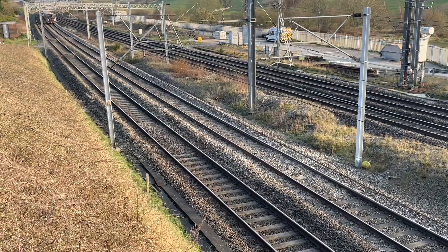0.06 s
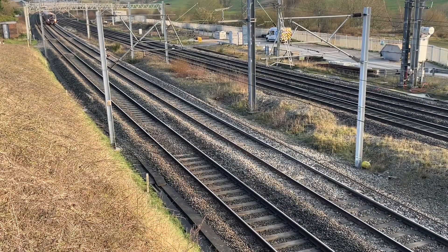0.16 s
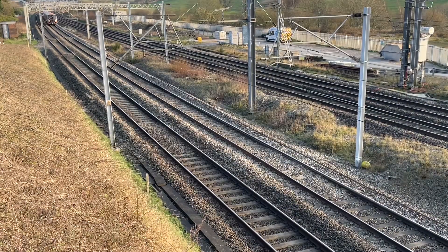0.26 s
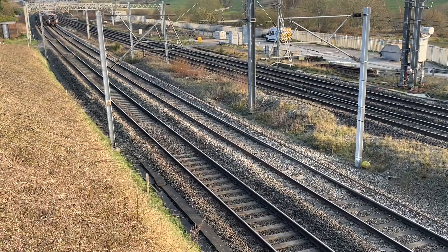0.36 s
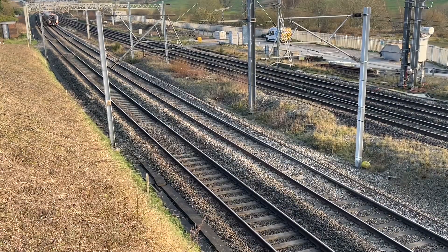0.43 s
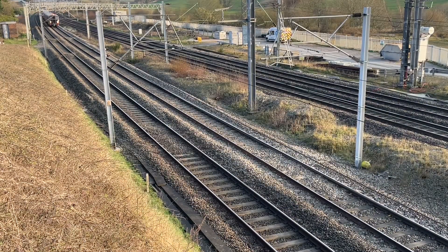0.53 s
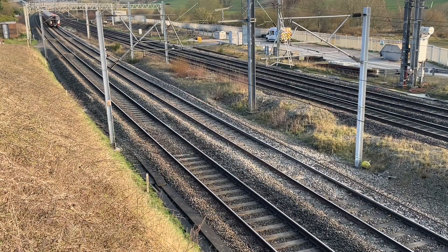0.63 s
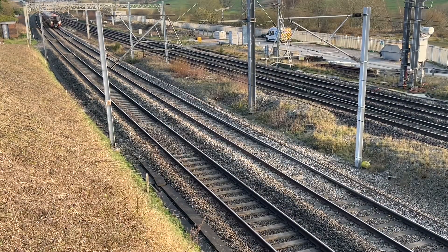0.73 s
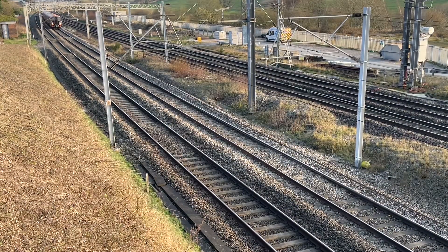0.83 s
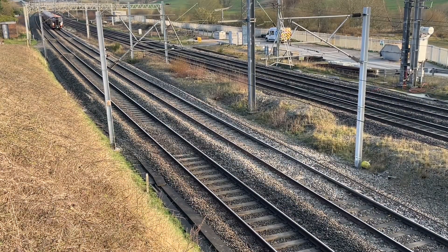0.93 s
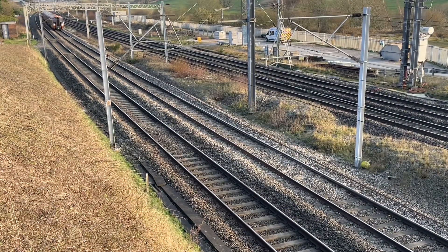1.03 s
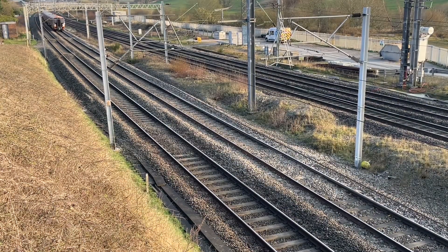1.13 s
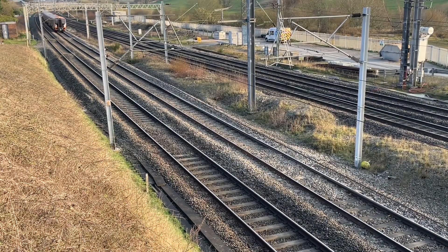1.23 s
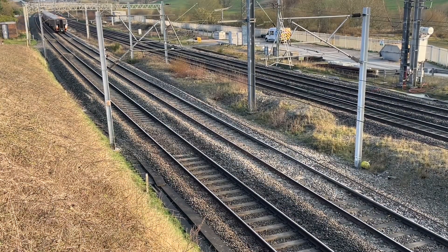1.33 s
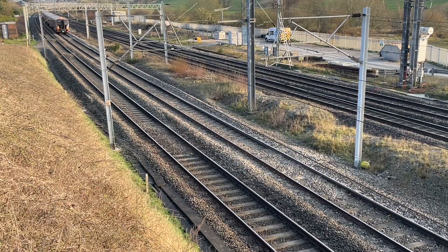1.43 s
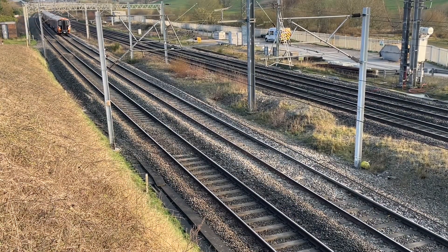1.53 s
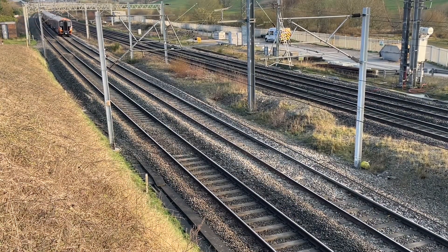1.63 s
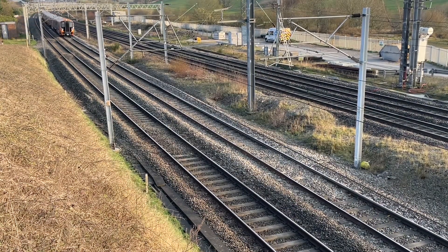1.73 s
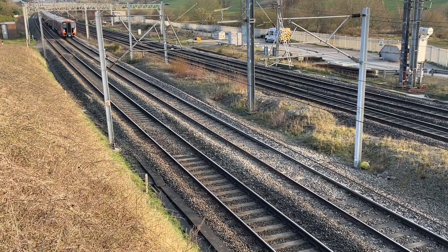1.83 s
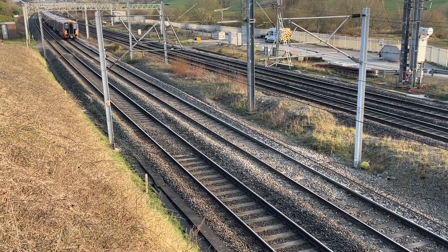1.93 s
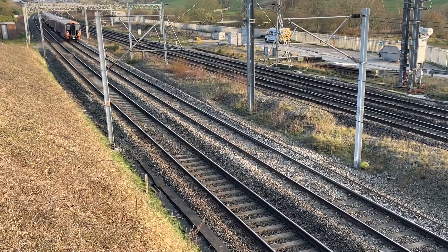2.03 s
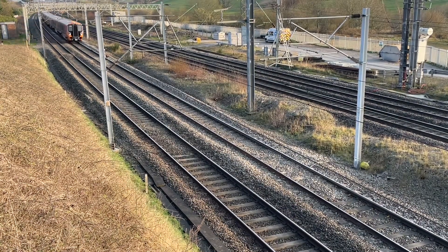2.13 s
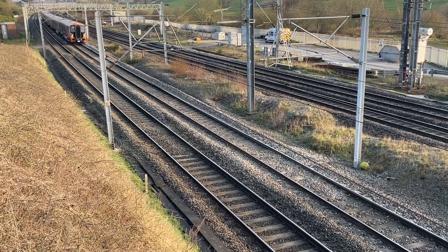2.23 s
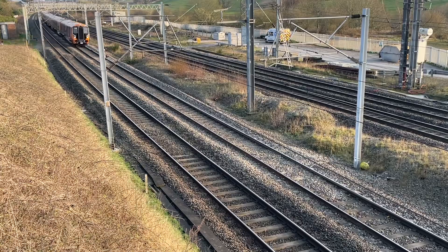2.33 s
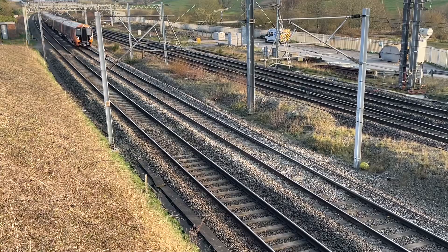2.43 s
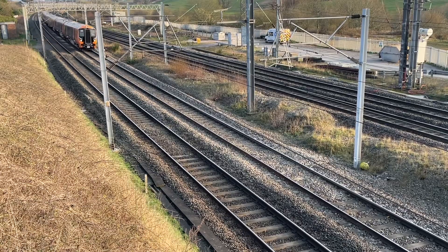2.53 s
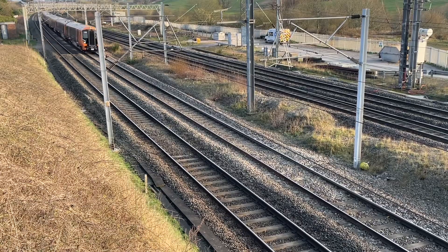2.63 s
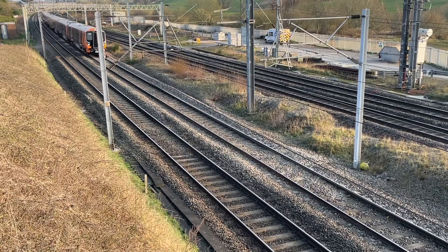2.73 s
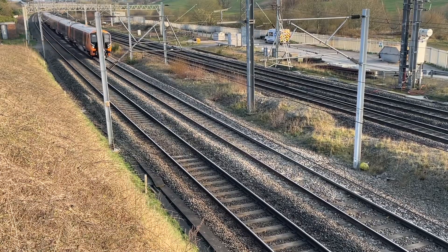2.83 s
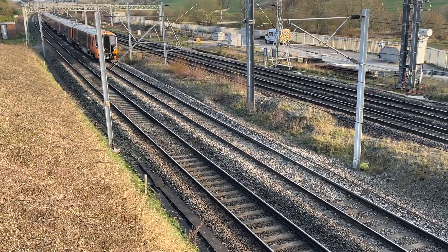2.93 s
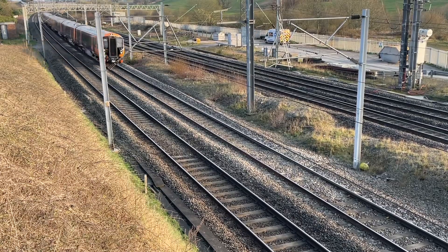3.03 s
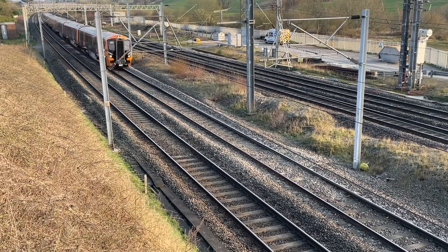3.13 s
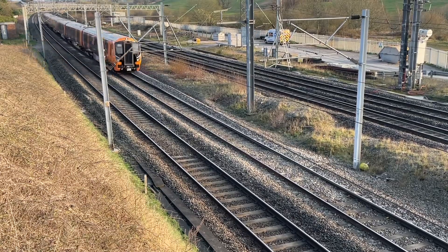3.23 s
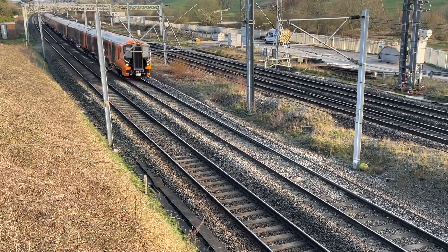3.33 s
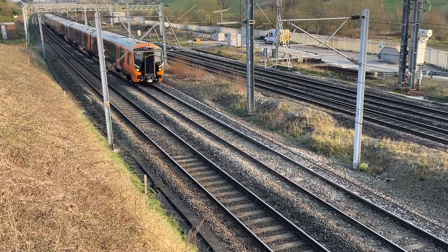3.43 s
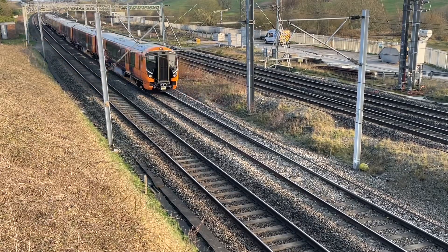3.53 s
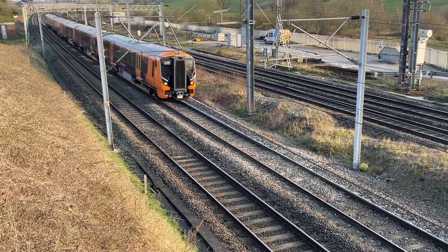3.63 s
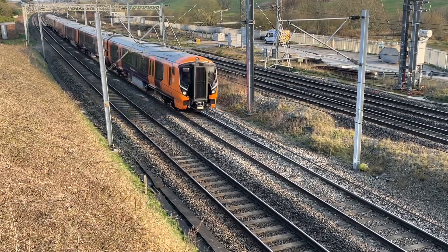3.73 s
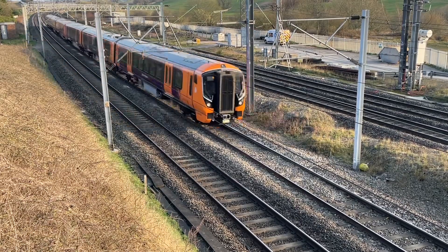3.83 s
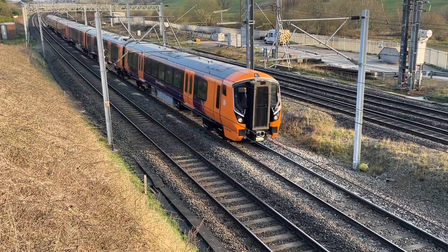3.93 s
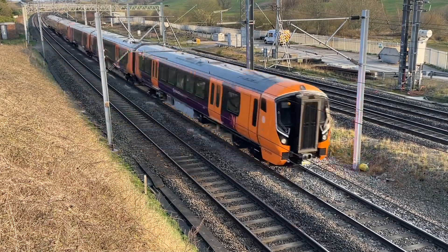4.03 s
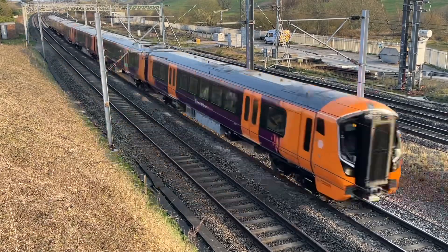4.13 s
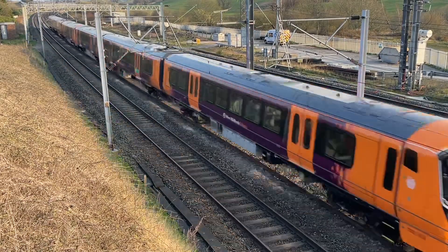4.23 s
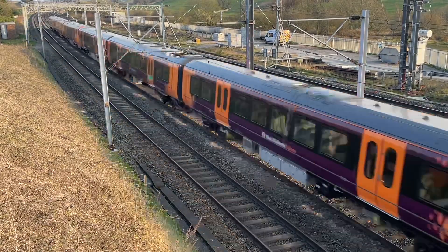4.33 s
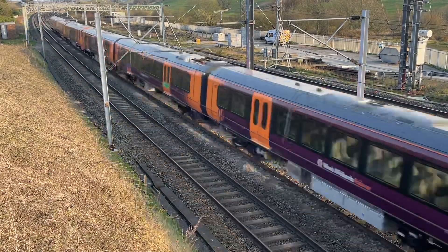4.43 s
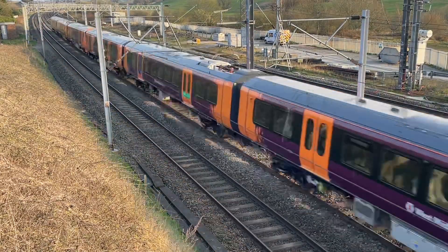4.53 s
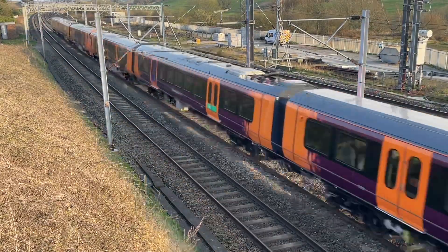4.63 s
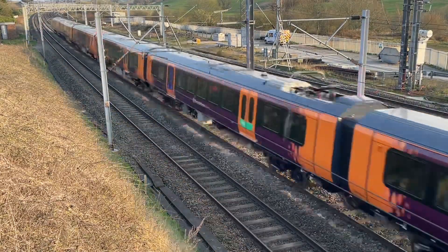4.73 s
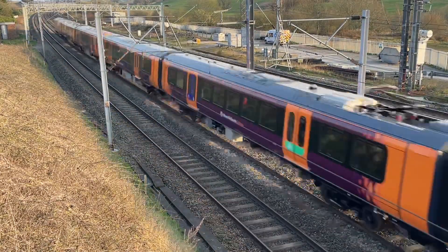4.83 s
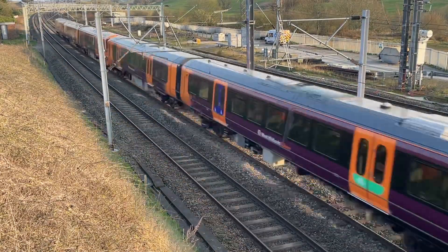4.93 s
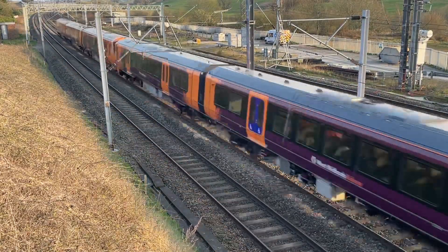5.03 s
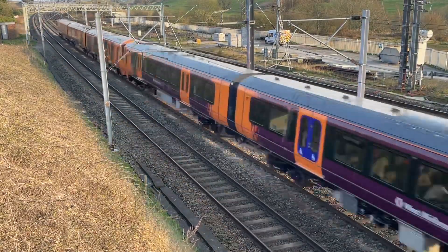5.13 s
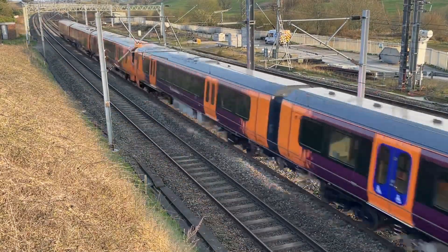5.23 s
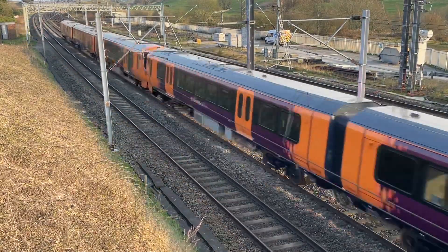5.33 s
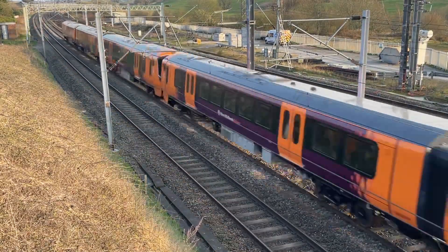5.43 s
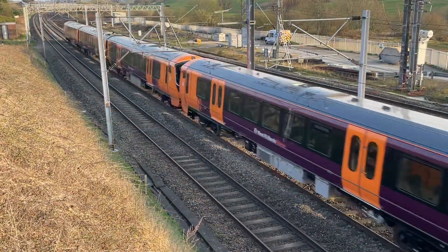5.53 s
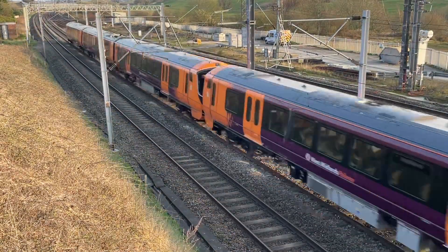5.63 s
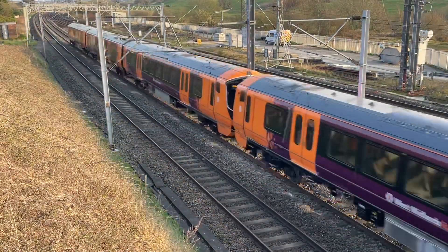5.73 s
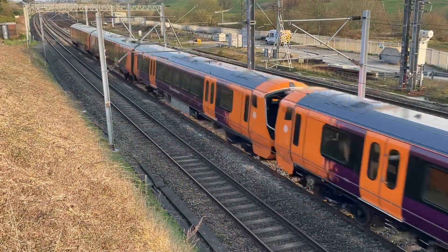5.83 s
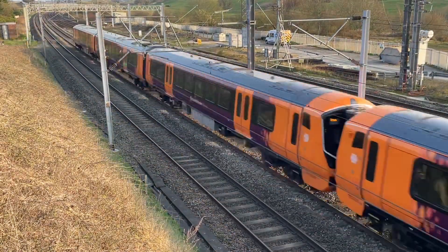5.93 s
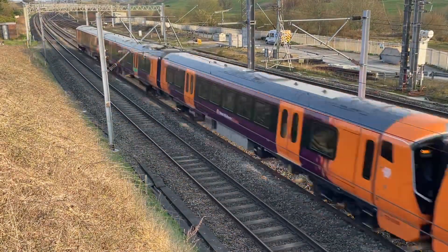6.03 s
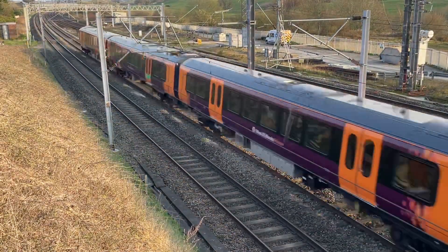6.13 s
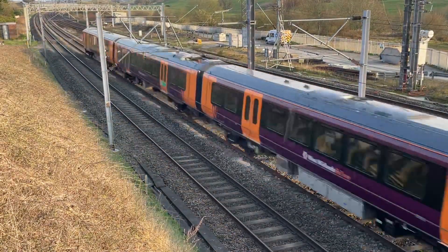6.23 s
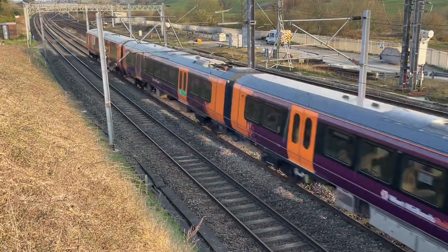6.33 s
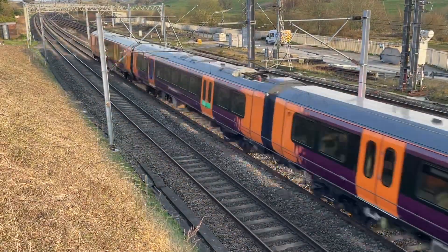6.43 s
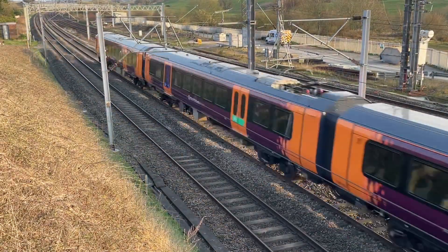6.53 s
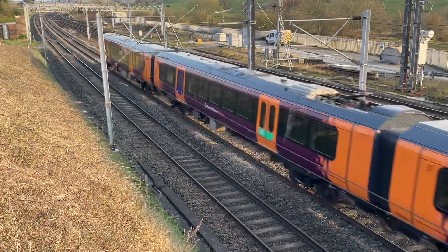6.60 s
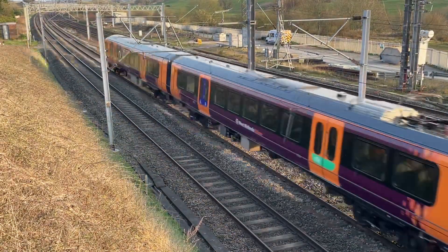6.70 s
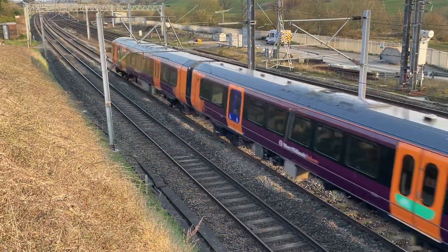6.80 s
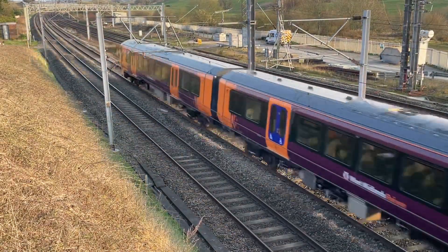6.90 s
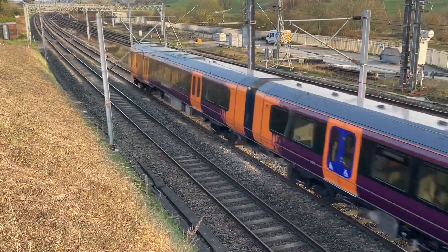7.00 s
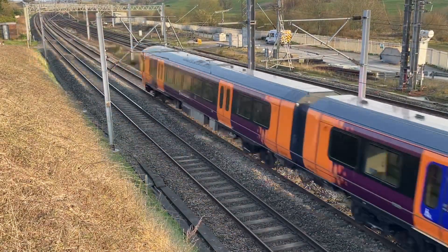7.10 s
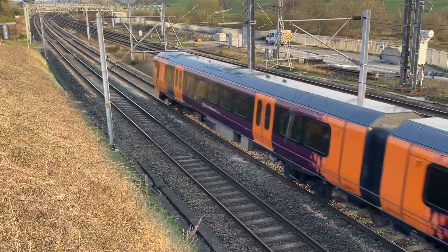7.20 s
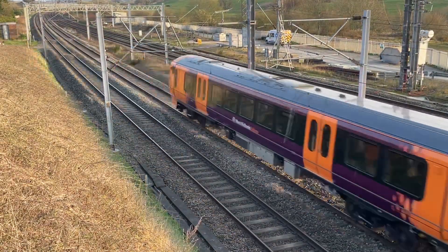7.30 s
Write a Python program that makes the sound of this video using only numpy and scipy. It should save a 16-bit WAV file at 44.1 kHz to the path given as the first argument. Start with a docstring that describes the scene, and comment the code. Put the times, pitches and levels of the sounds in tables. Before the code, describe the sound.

A breeze buffets the microphone on a grassy bank beside the tracks, and the rails sing faintly. An electric passenger train runs in with a growing hum of wheels, and the track rasps twice. The nose passes close with a low whoosh. Then the coaches go by in a loud, steady rumble and roar with hissing wheels, their draught buffeting the microphone.

```python
"""A breeze buffets the microphone and the rails sing faintly: an electric passenger train is far off.
Heard from a grassy bank, it runs in with a growing hum of wheels on rippled rail; the track twice rasps
loudly. The nose passes close below in a whoosh of pushed air. Then rough steel on steel makes sleepers
rumble, rails roar and wheels hiss as the coaches go by, and their draught buffets the single microphone."""
import sys
import numpy as np
from scipy import signal
from scipy.fft import rfft, irfft, next_fast_len
from scipy.io import wavfile
from scipy.ndimage import uniform_filter1d, map_coordinates

SR = 44100
rng = np.random.default_rng(int(sys.argv[2]) if len(sys.argv) > 2 else 0)


def unload_audio(sound):
    """Save the sound as a 16-bit wav file, at the path given as the first command line argument."""
    columns = np.transpose(np.atleast_2d(sound))
    # keep every value between -1 and 1, then stretch to whole-number steps
    steps = np.round(np.clip(columns, -1, 1) * 32767)
    wavfile.write(sys.argv[1], SR, steps.astype(np.int16))


N = 324576

SPEED_M_PER_S, ARRIVAL_S = 50, 4.458  # the leading coach draws level with the microphone at ARRIVAL_S
TURN_M, TURN_POWER = 10, .75  # how near and how steeply the sound turns from head-on to side-on
# How each sound carries to the bank: base level alongside in dB, reach in metres, dB lost per doubling.
SLEEPER_CARRY, RAIL_CARRY, WHEEL_CARRY = (-28.5, 46.4, 9.63), (-22, 21.4, 7.9), (-31, 24.9, 10.72)
RIPPLE_CARRY, BUFFET_CARRY, BOOM_CARRY = (-36, 45, 6), (-25.5, 41.5, 19.3), (-27.5, 110, 23)

# Rolling noise, head-on from afar and side-on from close by.
# Each row: frequency in Hz, relative level in dB.
SLEEPERS_HEAD_ON = [(85, -35), (112, 0), (138, 2.5), (200, 4), (270, -2), (350, -1), (480, -2), (600, -15),
                    (900, -43)]
SLEEPERS_SIDE_ON = [(85, -13), (120, 5.5), (180, 1), (240, -1.5), (330, -2.5), (440, -1), (540, -6),
                    (800, -21)]
RAILS_HEAD_ON = [(300, -17), (470, -4), (640, -3.5), (740, -2.5), (850, -2.5), (1000, -4.5), (1220, -5),
                 (1330, -9.5), (1550, -9), (1780, -10.5), (1930, -14), (2330, -13), (2900, -23.5),
                 (3600, -26)]
RAILS_SIDE_ON = [(260, -56), (450, -17.5), (503, -7), (580, -2), (659, -6), (736, -5.5), (823, -1.5),
                 (1200, -2), (1810, -7), (1940, -11), (2270, -10), (2680, -16.5), (3000, -18.5),
                 (3900, -52), (6600, -120)]
WHEELS_HEAD_ON = [(2200, -14), (2850, 2.5), (3250, -5), (3620, -11.5), (4050, 1), (4450, -2), (4800, -13.5),
                  (5350, -15.5), (5950, -9.5), (7000, -15), (8600, -16.5), (9450, -16), (10500, -19.5),
                  (11800, -22), (12800, -38)]
WHEELS_SIDE_ON = [(1650, -2), (2800, -8), (3270, -4.5), (4330, -3), (5680, -10.5), (7680, -14.5),
                  (9740, -21), (13000, -37.5)]
# The other noises heard on the bank. Each row: frequency in Hz, relative level in dB.
TOP_FIZZ = [(9000, -30), (12000, -8), (13000, -3), (14000, 0), (16000, -1)]
RASP_GRIND = [(200, -47), (420, -5), (580, -5), (720, 0.5), (950, -0.5), (1280, -6), (1550, -6),
              (1760, -3.5), (1900, -17.5), (2500, -32)]
RASP_SCRAPE = [(1700, -20), (2200, 1), (2500, -10), (3100, -14), (3800, -15), (7000, -28)]
NOSE_AIR = [(60, -6), (140, 3), (200, 0), (330, -13), (1500, -49), (4000, -41), (6500, -29.5), (9000, -37),
            (12500, -80), (15500, -49)]
DEEP_BOOM = [(22, 18), (34, -7.5), (50, 3), (68, -13.5), (84, -34), (130, -50)]
WIND_HEAVE = [(2, 13), (7, 8.5), (20, 4.5), (36, -3.5), (52, -11), (64, -15), (85, -61), (200, -90)]
WIND_BUFFET = [(35, -7), (58, 3.5), (85, -1), (120, -9), (160, -34), (300, -40)]
YARD_HUM = [(90, -30), (135, 2), (190, -19), (270, -9), (420, 5.5), (620, 5.5), (800, -6), (1200, -31),
            (2500, -45)]
# Resonances of rail and wheel steel. Each row: centre in Hz, width in Hz, relative level in dB.
RAIL_SONG_MODES = [(1084, 180, 7), (2236, 160, 4), (2486, 31, 9), (2570, 44, -9), (2870, 200, -17),
                   (3180, 350, -11), (4000, 480, -43)]
APPROACH_SIZZLE_MODES = [(5530, 140, 9), (6080, 120, 6), (6500, 53, 5), (7200, 60, -1), (8280, 60, -11),
                         (8900, 70, -11), (9260, 200, 0), (9900, 100, 2), (10400, 87, 2), (10900, 70, -27),
                         (11600, 160, -14)]
WHEEL_MODES = [(560, 13, -2.5), (596, 16, 3), (815, 45, 0), (2219, 20, -1.5), (4300, 330, -10.5)]
BRIGHT_WHEEL_MODES = [(1440, 140, 11), (1657, 14, -6)]
# Louder groups of wheels passing below. Each row: centre and half length in seconds,
# then extra rumble, roar and hiss in dB.
BOGIE_SWELLS = [(4.268, 0.18, 2, 2.4, 0.5), (4.5, 0.095, 5, -1, 0), (4.875, 0.27, 5, 3.5, 4.5),
                (5.226, 0.15, 4, 3, 1), (5.543, 0.29, 0, 2.5, 3), (5.853, 0.15, 2, 1, -0.5),
                (6.752, 0.37, 4.5, 4, 3.9), (7.262, 0.22, 1.5, 0.4, 2.5)]
# Harmonics of the ripple hum. Each row: multiple of the pitch, relative dB head-on, relative dB side-on.
RIPPLE_HARMONICS = [(1, -20, -6), (2, -7, -2.5), (3, -4, -0.5), (4, -14, -5.5)]
# The hum flares on the approach. Each row: centre and half length in seconds, extra level in dB.
RIPPLE_FLARES = [(2.502, 0.066, 11), (2.747, .04, 6.5), (2.874, 0.043, 5.5), (3.19, 0.026, 5),
                 (3.326, .07, 4.5), (3.515, .035, 10.5)]
# Rasps from up the track. Each row: peak time in seconds, grind level in dB, rise and fall in seconds,
# ring pitch in Hz, then ring and scrape in dB relative to the grind.
TRACK_RASPS = [(2.015, -42, .03, .025, 1300, -4, -25), (2.312, -34, .024, .026, 1230, 3, -22),
               (2.335, -28, .013, .013, 770, -1, -25), (2.39, -35, .02, .025, 690, 1, -20),
               (2.497, -36, .012, .018, 980, 0, -11), (3.535, -31, .01, .02, 1200, -3, -12),
               (3.592, -26, .022, .025, 1740, -4, -11), (3.634, -25, .016, .035, 830, 1, -12)]
# Gusts at the microphone. Each row: centre and half length in seconds, heave and thud levels in dB.
BREEZE_GUSTS = [(.3, 0.16, -24.5, -54), (0.818, 0.091, -18.5, -42), (1.334, 0.083, -27, -41.5),
                (1.66, 0.42, -25.5, -49), (1.986, 0.081, -26, -52), (2.029, 0.016, -32, -25.5),
                (2.55, 0.8, -22.5, -57), (3.374, 0.027, -10.5, -31)]
# Thin falling chirps. Each row: centre in seconds, peak in dB, half length in seconds,
# centre pitch in Hz, glide in Hz per second.
FALLING_CHIRPS = [(.285, -69, .02, 4950, -6000), (1.428, -62, .013, 4700, -42000),
                  (1.968, -35, .012, 1150, -16000)]


def rolling(abreast):
    """Rough steel on steel shakes sleepers, rails and wheels; the colour fills out close to the bank."""
    swells_db = sum(np.outer(extra_db, bell(s, half)) for s, half, *extra_db in BOGIE_SWELLS)
    carried_db = [carried(*SLEEPER_CARRY), carried(*RAIL_CARRY), carried(*WHEEL_CARRY)]
    sleeper_db, rail_db, wheel_db = swells_db + carried_db
    far, near = np.sqrt(1 - abreast), np.sqrt(abreast)
    sleepers = far * amp(0.4) * rush(SLEEPERS_HEAD_ON, patchy_db=2)
    sleepers += near * rush(SLEEPERS_SIDE_ON, patchy_db=0.5)
    rails = far * amp(0.5) * rush(RAILS_HEAD_ON, patchy_db=1.5)
    rails += near * rush(RAILS_SIDE_ON, patchy_db=1.42, modal_db=-0.4)
    rails += near * amp(-10.5) * ringing(WHEEL_MODES)  # the wheels' ring follows the roar's level
    wheels = far * rush(WHEELS_HEAD_ON, patchy_db=1.5, modal_db=1)
    wheels += far * amp(-14.5) * ringing(APPROACH_SIZZLE_MODES)
    wheels += near * amp(0.36) * rush(WHEELS_SIDE_ON, patchy_db=1, modal_db=0.2)
    fizz = amp(wheel_db - 31 - 3.1 * near) * rush(TOP_FIZZ, patchy_db=2)
    roar = amp(rail_db + 0.16 * wobble(14)) * rails
    return amp(sleeper_db) * sleepers + roar + amp(wheel_db) * wheels + fizz


def ripple_hum(abreast, head_on_hz=604, doppler_drop_hz=15.3, entry_s=2.43, step_db=13.5):
    """Wheels run onto finely rippled rail and hum at nearly one pitch, beating fastest head-on."""
    pitch_hz = head_on_hz - doppler_drop_hz * abreast
    phase = 2 * np.pi * np.cumsum(pitch_hz) / SR
    db = carried(*RIPPLE_CARRY) - step_db * (1 - onset(entry_s, rise_s=0.23))
    db += sum(extra_db * bell(s, half) for s, half, extra_db in RIPPLE_FLARES)
    flutter = lambda rate: wobble(rate) + 1j * wobble(rate)
    hum = np.zeros(N)
    for multiple, far_db, near_db in RIPPLE_HARMONICS:
        beats = np.sqrt(1 - abreast) * flutter(34) + np.sqrt(abreast) * flutter(11) + .35 * flutter(100)
        tone = unit(np.real(beats * np.exp(1j * round(multiple) * phase)))
        hum += amp(db + far_db + abreast * (near_db - far_db)) * tone
    return hum


def rasps():
    """Short grinding swells come from up the track, each with one ringing note in it."""
    t = np.arange(N) / SR
    grind, scrape = rush(RASP_GRIND, patchy_db=2), rush(RASP_SCRAPE, patchy_db=2)
    out = np.zeros(N)
    for s, db, rise, fall, ring_hz, ring_db, scrape_db in TRACK_RASPS:
        from_peak = (t - s) / np.where(t < s, rise, fall)
        swell = np.exp(1 - np.sqrt(1 + np.minimum(from_peak ** 2, 900)))
        note = np.sqrt(2) * np.sin(2 * np.pi * ring_hz * t + wobble(110))
        out += amp(db) * swell * (grind + amp(ring_db) * note + amp(scrape_db) * scrape)
    return out


def bow_wave(at_s=4.33, width_s=0.3, db=-25):
    """Air pushed aside by the nose crosses the bank in one low whoosh."""
    t = np.arange(N) / SR
    return amp(db) / (1 + ((t - at_s) / width_s) ** 2) ** 1.7 * rush(NOSE_AIR, patchy_db=2.5)


def boom():
    """The deepest part of the rumble reaches the bank from far down the line."""
    return amp(carried(*BOOM_CARRY) + 1.7 * wobble(10)) * rush(DEEP_BOOM, patchy_db=-1.5)


def bright_wheels(at_s=6.83, half_s=.3, db=-27):
    """One set of wheels rings brighter as it passes below the microphone."""
    return amp(db) * bell(at_s, half_s) * ringing(BRIGHT_WHEEL_MODES)


def rail_song():
    """The rails carry a few ringing bands far ahead of the wheels."""
    return amp(-53.5 + 0.92 * wobble(4.2)) * ringing(RAIL_SONG_MODES)


def wind(breeze_db=-43, draught_db=-22, surge_s=4.36, surge_half_s=.5):
    """Eddies heave and gusts thud on the microphone; the draught surges behind the nose, then buffets."""
    surge = bell(surge_s, surge_half_s)
    draught = onset(surge_s - surge_half_s, rise_s=.27) * amp(draught_db + 10 * surge)
    gusts, thuds = sum(np.outer(amp(levels_db), bell(s, half)) for s, half, *levels_db in BREEZE_GUSTS)
    heave = np.sqrt(amp(breeze_db) ** 2 + gusts ** 2 + draught ** 2)
    buffet = amp(carried(*BUFFET_CARRY) + 5 * surge + 2.1 * wobble(18))
    return heave * rush(WIND_HEAVE, patchy_db=0.5) + (buffet + thuds) * rush(WIND_BUFFET, patchy_db=0.4)


def chirps():
    """Faint, quick whistles slide downward while the train is still far off."""
    out = np.zeros(N)
    t = np.arange(-SR // 10, SR // 10) / SR
    for s, db, half, hz, glide in FALLING_CHIRPS:
        whistle = np.sin(2 * np.pi * (hz + glide * t / 2) * t)
        start = round((s + t[0]) * SR)
        out[start:start + len(t)] += amp(db - 7.6 * (t / half) ** 2) * whistle
    return out


def yard():
    """The open yard lays a dull hum and a faint hiss under everything."""
    hiss = amp(-80) * rush(TOP_FIZZ, patchy_db=1)
    return hiss + amp(-50 + .6 * wobble(4.2)) * rush(YARD_HUM, patchy_db=3.2)


def distance():
    """Metres of track from the leading coach to the microphone; 0 while the coaches go by."""
    return SPEED_M_PER_S * np.maximum(ARRIVAL_S - np.arange(N) / SR, 0)


def carried(level_db, reach_m, loss_db):
    """Level in dB on the bank: it grows as the train nears and holds while it is alongside."""
    return level_db - loss_db * np.log2(np.hypot(1, distance() / reach_m))


def rush(spectrum, patchy_db, modal_db=0):
    """Noise of rms 1 with drifting patches and, by modal_db, many narrow fixed resonances."""
    cells = signal.stft(rng.standard_normal(N), nperseg=1024)[2]
    patches = uniform_filter1d(rng.standard_normal(cells.shape), size=7, axis=0)
    patches = uniform_filter1d(patches, size=12, axis=1)
    modes = uniform_filter1d(rng.standard_normal((len(cells), 1)), size=3, axis=0)
    texture = amp(patchy_db * unit(patches) + modal_db * unit(modes))
    noise = signal.istft(cells * texture, nperseg=1024)[1][:N]
    knots_hz, db = np.transpose(spectrum)
    colour = lambda hz: amp(np.interp(np.log(hz + 1e-3), np.log(knots_hz), db, left=-120, right=-120))
    return unit(filtered(noise, colour))


def ringing(modes):
    """Noise of rms 1 held in a few steep-sided resonances."""
    gain = lambda f: sum(amp(db) / (1 + ((f - hz) / (width / 2)) ** 2) for hz, width, db in modes)
    return unit(filtered(rng.standard_normal(N), gain))


def filtered(x, response):
    """Filter x by a gain given as a function of Hz."""
    size = next_fast_len(N + SR // 2)
    return irfft(rfft(x, size) * response(np.fft.rfftfreq(size, 1 / SR)), size)[:N]


def wobble(rate):
    """A smooth random curve, rate knots a second."""
    at = np.linspace(0, N * rate / SR, N // 32)
    curve = map_coordinates(rng.standard_normal(int(N * rate / SR) + 4), [at])
    return np.interp(np.arange(N), np.linspace(0, N, len(at)), curve)


def bell(at_s, half_s):
    """A smooth swell from 0 to 1 and back, centred on at_s."""
    return np.exp(-np.minimum(((np.arange(N) / SR - at_s) / half_s) ** 2, 50))


def onset(at_s, rise_s):
    """A smooth step from 0 to 1, half way at at_s."""
    return .5 + .5 * np.tanh((np.arange(N) / SR - at_s) / rise_s)


def amp(db):
    """Decibels to gain."""
    return 10 ** (np.asarray(db) / 20)


def unit(x):
    """Scale to rms 1."""
    return x / np.sqrt(np.mean(x ** 2) + 1e-20)


def scene():
    """Train, yard, chirps and wind at one microphone on the bank."""
    abreast = np.clip((1 + (distance() / TURN_M) ** 2) ** -TURN_POWER, 0, 1)  # 0 head-on, 1 side-on
    train = rolling(abreast) + rail_song() + ripple_hum(abreast) + rasps()
    train = train + bow_wave() + boom() + bright_wheels()
    return (train + yard() + chirps() + wind())[None]


def record(dry, top_hz=15750):
    """The recorder opens and closes softly, clips at full scale and keeps nothing above top_hz."""
    edges = signal.windows.tukey(N, .002)
    return filtered(np.clip(dry[0] * edges, -1, 1), lambda hz: hz < top_hz)[None]


dry = scene()
out = record(dry)
unload_audio(out)
```